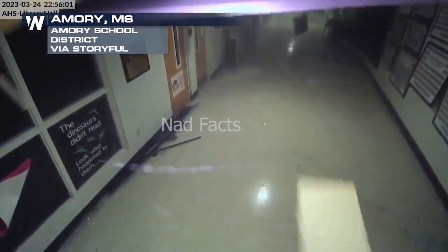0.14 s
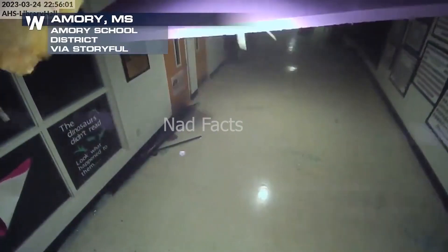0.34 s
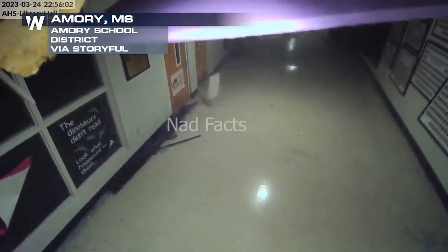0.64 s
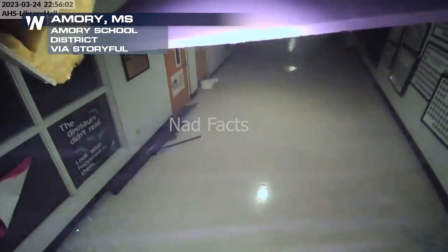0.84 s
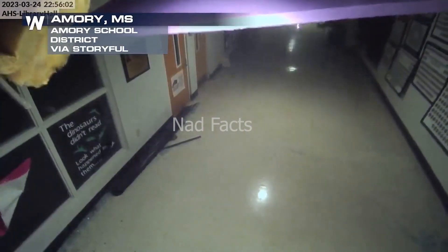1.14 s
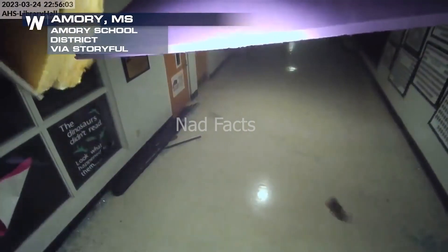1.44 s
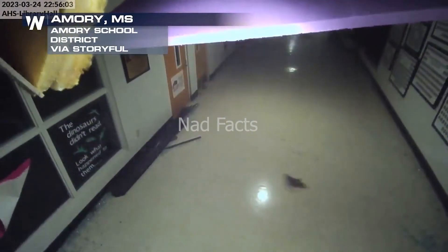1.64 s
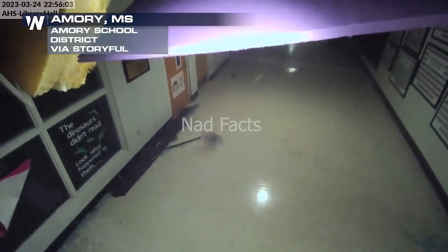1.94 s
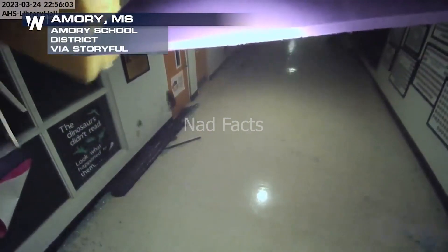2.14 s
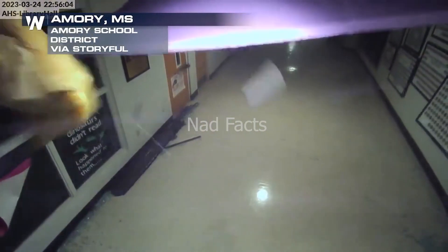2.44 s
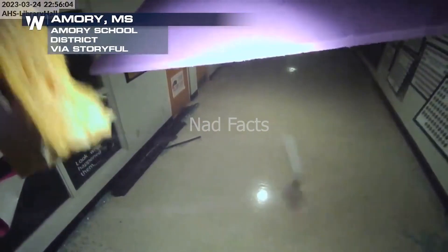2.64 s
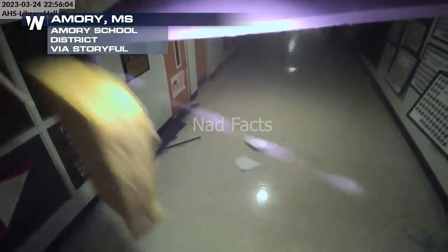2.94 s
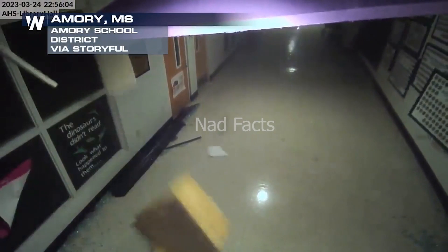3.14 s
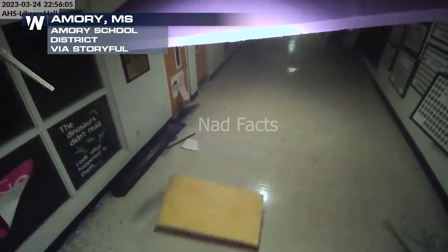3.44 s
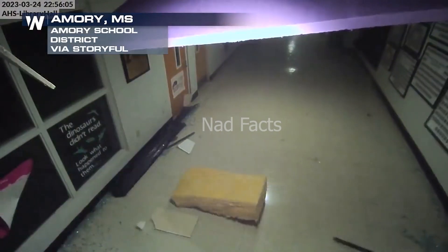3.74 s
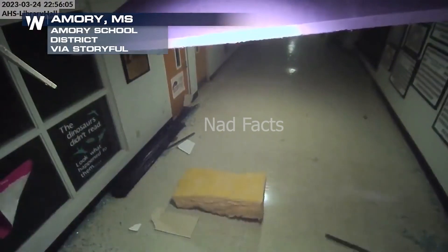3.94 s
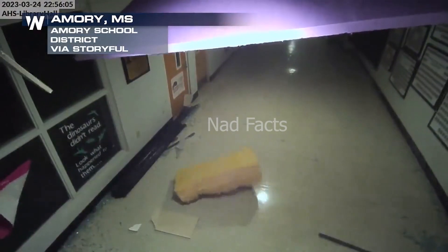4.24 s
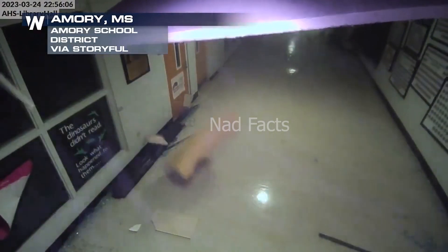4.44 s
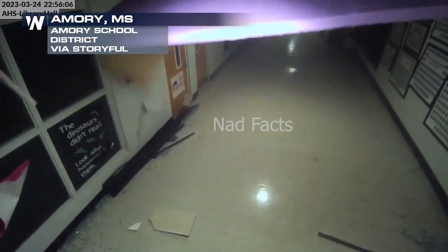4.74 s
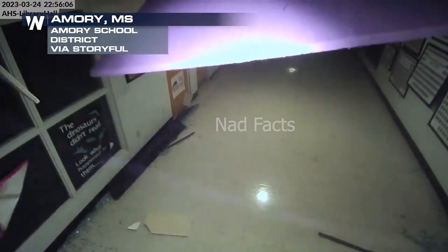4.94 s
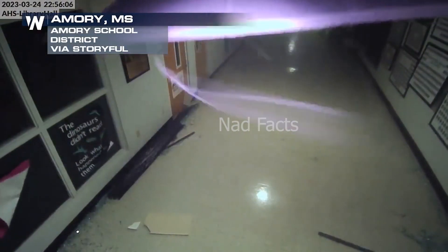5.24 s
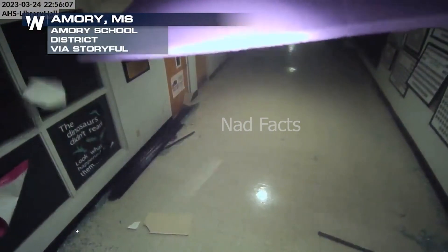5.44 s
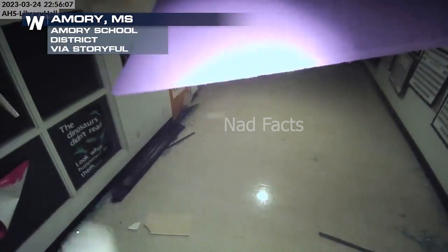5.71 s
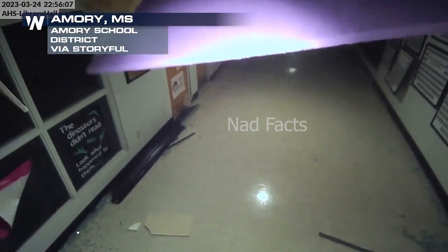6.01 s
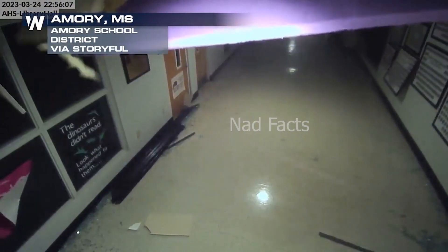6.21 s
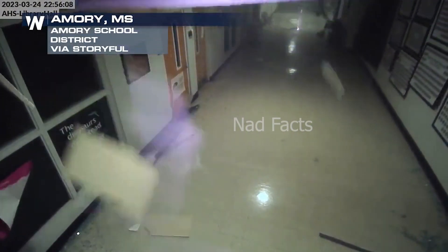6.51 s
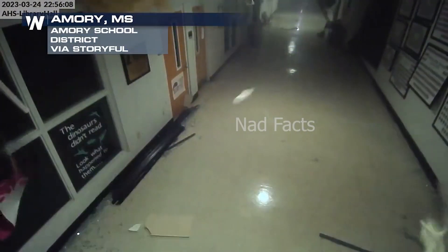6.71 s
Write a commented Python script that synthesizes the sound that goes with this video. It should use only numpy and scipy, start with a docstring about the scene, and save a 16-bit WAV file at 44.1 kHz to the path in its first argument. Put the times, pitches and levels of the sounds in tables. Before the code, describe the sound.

Violent, distorted tornado wind roars and rumbles through a corridor in gusts, with dull knocks of debris and hoarse whistling.

```python
"""A tornado blows through a school corridor, heard by a security camera's small microphone.
It opens on a gust, air and grit rushing along the walls; gaps shriek, then loose panels boom.
After a lull the biggest gust hits at 3.7 s: the building roars and short, dull knocks break through.
Gusts keep coming to the end. Throughout, they drive the input into hard clipping, which chops
the rush into a ragged crackle, and a slow converter lays a thin sizzle on top."""
import sys
import numpy as np
from scipy import signal
from scipy.fft import rfft, irfft
from scipy.io import wavfile
from scipy.ndimage import uniform_filter1d

SR = 44100
rng = np.random.default_rng(int(sys.argv[2]) if len(sys.argv) > 2 else 0)


def generate_wav(sig):
    """Save sig (samples, or channels by samples) to the path in sys.argv[1] as 16-bit PCM at SR."""
    pcm = np.round(np.clip(np.atleast_2d(sig).T, -1, 1) * 32767).astype(np.int16)
    wavfile.write(sys.argv[1], SR, pcm)


N = 302967
TIME, FREQS = np.arange(N) / SR, np.fft.rfftfreq(N, 1 / SR)

# gusts down the corridor: start/s, length/s, push on the mic/dB, building roar/dB, eddy speed/ratio
GUSTS = [(.005, 0.24, -14, -36.5, 1.27), (0.259, 0.14, -19, -35, 1.12), (.42, .5, -29, -31.5, 1.11),
         (0.978, .3, -25, -27, 1.31), (1.321, .36, -22, -27.5, 0.68), (1.849, .23, -17.5, -22, 1.13),
         (2.098, .25, -31.5, -21.5, 1.53), (3.127, 0.1219, -28.5, -30, 1.08),
         (3.674, 0.699, -12.5, -15, 1.056), (4.392, 0.3047, -18, -18.5, 1.05), (4.72, 0.2029, -15, -23, .9),
         (4.994, .65, -21.5, -26.5, 0.96), (5.68, 0.22, -18, -23, 1.01), (5.98, .62, -24, -28.5, .92),
         (6.66, 0.24, -15.5, -21.5, 1.69)]
# tone of eddies hitting the mic: f/Hz, level/dB
BUFFET_EQ = [(8, -17.5), (22, -3.5), (35, 0.5), (60, -3.5), (110, -12), (200, -20.5), (400, -41.5),
             (1000, -54), (3000, -68.5)]
# tone of the rushing air: f/Hz, level/dB
RUSH_EQ = [(60, -12.5), (400, -5), (640, -8), (850, -5), (1150, -3.5), (1450, -0.5), (1570, -4), (1750, -3),
           (1980, 0.5), (2300, 1.5), (2530, 0.5), (2800, 1), (5500, -16), (8000, -27.5)]
# fader and tone ride of the rush: t/s, level/dB, tilt in the steady draught/(dB per octave)
RUSH_RIDE = [(0, -20, 0.5), (0.079, -29.5, 1.5), (.45, -21, 1), (0.901, -21.5, 1), (1.4, -23, 1.5),
             (1.8, -20.7, -0.5), (2.05, -21, 1), (2.3, -23.5, -2), (2.95, -24, 1), (3.2, -25.5, -3),
             (3.6, -26, -.5), (3.949, -25.5, 4), (4.42, -23.5, -1), (5.001, -25, 1), (5.35, -22, -0.5),
             (6.63, -23, -1.5), (6.71, -30.5, 0.5), (6.87, -23.5, 3)]
# tone of the roaring building: f/Hz, level/dB
ROAR_EQ = [(40, -19), (90, -0.5), (140, -1.5), (220, -3.5), (330, -9), (440, -9), (560, -18.5),
           (900, -18.5), (1600, -35.5), (3000, -38)]
# short, dull knocks breaking through the clipped wind: t/s, level/dB, f/Hz, ring time/s
DULL_KNOCKS = [(1.456, -10.5, 1120, 0.052), (3.688, -2, 222, 0.095), (3.752, -2, 810, 0.036),
               (3.941, -1, 800, 0.025), (4.072, -5, 500, 0.057), (4.199, -8.5, 600, 0.022),
               (4.36, -1, 652.8, 0.027), (4.426, -12, 720, 0.25), (4.757, -5.5, 485, 0.21),
               (4.858, -8.5, 950, 0.062), (5.661, -17, 1102, 0.041)]
# loose panels booming in the wind: t/s, level/dB, f/Hz
PANEL_BOOMS = [(.73, -24, 404), (1.009, -22, 142), (2.14, -14.5, 130), (2.233, -13, 403), (3.135, -24, 370),
               (4.552, -12, 167), (6.73, -15, 119)]
# air shrieking through gaps: start/s, end/s, f/Hz, bandwidth/Hz, level/dB
GAP_SHRIEKS = [(0.294, 1.4, 1435, 171, -30.5), (0.315, .85, 1940, 300, -27),
               (0.804, 1.295, 2040, 320, -30.5), (3.155, 3.68, 2635, 203, -32),
               (5.097, 6.699, 1394, 124, -40)]
# tiny sharp ticks: t/s, level/dB
TICKS = [(.4485, -22.5), (1.081, -23), (1.627, -29.5), (1.826, -38), (1.922, -39.5), (3.687, -27.5),
         (6.402, -29), (6.658, -19)]
# the camera's voice-band filter: f/Hz, level/dB
VOICE_BAND_EQ = [(20, 0), (2550, 0), (2640, -3.5), (2820, -7), (2890, -14.5), (3015, -16), (3060, -25),
                 (3190, -26), (3280, -85)]

# the steady draught under the gusts: push on the mic, building roar, eddy speed ratio
DRAUGHT_PUSH_DB, DRAUGHT_ROAR_DB, DRAUGHT_SPEED = -37, -36.5, 1.2


def wind(attack_s=0.02564, release_s=0.05):
    """Gusts rise, hold and die away over the draught: curves of push/dB, roar/dB and eddy speed."""
    push_power = np.full(N, amp(DRAUGHT_PUSH_DB) ** 2)
    roar_power = np.full(N, amp(DRAUGHT_ROAR_DB) ** 2)
    weighted_speed = push_power * DRAUGHT_SPEED
    for start, length, push_db, roar_db, speed in GUSTS:
        age = TIME - start
        envelope = np.clip(age / attack_s, 0, 1) * np.exp(-np.clip((age - length) / release_s, 0, 20))
        gust_power = (amp(push_db) * envelope) ** 2
        push_power += gust_power
        weighted_speed += gust_power * speed
        roar_power += (amp(roar_db) * envelope) ** 2
    return 10 * np.log10(push_power), 10 * np.log10(roar_power), weighted_speed / push_power


def buffet(push_db, speed, lumpy_db=2.5):
    """Eddies strike the mic: a deep, lumpy rumble that pitches up with their speed."""
    eddies = noise(amp(eq_db(BUFFET_EQ, FREQS)))
    passing = np.interp(np.cumsum(speed) % N, np.arange(N), eddies)
    return amp(push_db + lumpy_db * flutter(hz=15)) * steadied(passing, size=5000)


def heave(push_db, speed, trim_db=-4, db_per_octave=-8.5):
    """Subsonic pressure swings pin the mic to its rails; slow, large eddies heave the most."""
    swings = noise(1 / (1 + (FREQS / 15) ** 4) * FREQS / (FREQS + 2))
    return amp(trim_db + push_db + db_per_octave * np.log2(speed)) * steadied(swings, size=16000)


def rush(air_db, tilt, patchy_db=1.25, flicker_db=1.5):
    """Air streams along the walls in drifting patches of colour; tilt is in dB per octave."""
    hz, t, spectra = signal.stft(rng.standard_normal(N), SR, nperseg=1024, noverlap=768)
    octaves = np.log2((hz + 300) / 1800)
    drift = uniform_filter1d(rng.standard_normal(spectra.T.shape), size=12, axis=0)
    patches = unit(uniform_filter1d(drift, size=6, axis=1))
    tilt_db = np.interp(t, TIME, tilt)[:, None] * octaves
    colour = amp(eq_db(RUSH_EQ, hz) + tilt_db + patchy_db * patches)
    colour /= np.linalg.norm(colour, axis=1, keepdims=True)  # the tone moves, the level stays
    _, air = signal.istft(spectra * colour.T, nperseg=1024, noverlap=768)
    return amp(air_db + flicker_db * flutter(hz=60)) * unit(air[:N])


def roar(roar_db, surge_db=2.5):
    """The corridor and its ceiling boom under the wind: a surging low end."""
    body = steadied(noise(amp(eq_db(ROAR_EQ, FREQS))), size=4000)
    return amp(roar_db + surge_db * flutter(hz=25.4)) * body


def knocks(width_ratio=1.16):
    """Short, dull knocks break through the clipped wind, too broad to carry a note."""
    return sum(amp(db) * burst(start, hz, width_ratio * hz, attack_s=0.002, t60=ring_s)
               for start, db, hz, ring_s in DULL_KNOCKS)


def booms(width_ratio=0.21):
    """Loose panels flex with a low, lingering note."""
    return sum(amp(db) * burst(start, hz, width_ratio * hz, attack_s=0.0035, t60=0.39)
               for start, db, hz in PANEL_BOOMS)


def shrieks():
    """Hoarse whistles swell and fade as air is forced through gaps."""
    out = np.zeros(N)
    for start, end, hz, width_hz, db in GAP_SHRIEKS:
        progress = np.clip((TIME - start) / (end - start), 0, 1)
        swell = np.sqrt(abs(np.sin(np.pi * progress)))
        out += amp(db) * swell * resonant_noise(hz, width_hz)
    return out


def grit(air_db, trim_db=-10, taps_per_s=100, spread_db=5.5, decay_s=0.00071):
    """Fine grit taps along the corridor, as hard as the air carries it."""
    t, out = np.arange(400) / SR, np.zeros(N)
    for hz in np.geomspace(900, 2900, num=12):
        taps = rng.random(N) < taps_per_s / 12 / SR
        strength = amp(spread_db * np.minimum(rng.exponential(1, N), 3))
        ping = np.sin(2 * np.pi * hz * t) * np.exp(-t / decay_s)
        out += signal.oaconvolve(taps * strength, ping)[:N]
    return amp(air_db + trim_db) * unit(out)


def ticks():
    """A few tiny, bright ticks, each three samples long."""
    out = np.zeros(N)
    for start, db in TICKS:
        out[round(start * SR):][:3] += amp(db) * np.hanning(5)[1:-1]
    return out


def burst(start, hz, width_hz, attack_s, t60):
    """One burst of resonant noise with a fast attack and a fading tail."""
    age = np.maximum(TIME - start, 0)
    envelope = (1 - np.exp(-age / attack_s)) * np.exp(-np.log(1000) * age / t60)
    return envelope * steadied(resonant_noise(hz, width_hz), size=1200)


def resonant_noise(hz, width_hz):
    """Noise ringing in one resonance."""
    return noise(1 / (1 + ((FREQS - hz) / (0.48 * width_hz)) ** 2))


def flutter(hz):
    """A random modulator of rms one, rolling off above hz."""
    return noise(1 / (1 + (FREQS / hz) ** 4))


def noise(gain):
    """Noise of rms one, shaped by a gain at each frequency."""
    return unit(irfft(rfft(rng.standard_normal(N)) * gain, N))


def steadied(x, size):
    """A leveller: holds the power even over stretches of size samples."""
    power = uniform_filter1d(uniform_filter1d(x ** 2, size), size // 2)
    return x / np.sqrt(abs(power) + 1e-9)


def minimum_phase(curve, size=4096):
    """The impulse response of an EQ curve, with no pre-ring."""
    gain = amp(eq_db(curve, np.fft.rfftfreq(size, 1 / SR)))
    cepstrum = irfft(np.log(gain), size)
    cepstrum[1:size // 2] *= 2
    cepstrum[size // 2 + 1:] = 0
    return irfft(np.exp(rfft(cepstrum)), size)


def eq_db(curve, hz):
    """An EQ curve's level at hz, its points joined over log frequency."""
    points_hz, db = np.transpose(curve)
    return np.interp(np.log(hz + 1), np.log(points_hz), db)


def amp(db):
    """Decibels to gain."""
    return 10 ** (np.asarray(db) / 20)


def unit(x):
    """Scales to an rms of one."""
    return x / np.sqrt(np.mean(x ** 2) + 1e-20)


def scene(swell_db=0.52, dulling=0.26):
    """The mono mix ahead of the clipper."""
    push_db, roar_db, speed = wind()
    times, levels, tilts = np.transpose(RUSH_RIDE)
    air_db = np.interp(TIME, times, levels) + swell_db * flutter(hz=6.1)
    # the rush darkens as a gust builds: dulling is dB per octave lost for each dB of push
    tilt = np.interp(TIME, times, tilts) - dulling * (push_db - DRAUGHT_PUSH_DB)
    low_end = heave(push_db, speed) + buffet(push_db, speed) + roar(roar_db) + booms()
    return (low_end + rush(air_db, tilt) + grit(air_db) + shrieks() + knocks())[None]


def record(dry, rail_db=-18.5, hiss_db=-34.5, hold_samples=4, sizzle_db=1.83, high_cut_hz=11100):
    """Hard clipping under a faint, steady hiss, then voice band, sample-and-hold, ticks, high cut."""
    # while a gust pins the input to its rail, the rest of the scene is cut out
    clipped = np.clip(dry[0], -amp(rail_db), amp(rail_db))
    nyquist_hz = SR / hold_samples / 2
    hiss = amp(hiss_db) * noise(FREQS < nyquist_hz)
    narrow = signal.oaconvolve(clipped + hiss, minimum_phase(VOICE_BAND_EQ))[:N]
    # the converter's stair steps mirror the voice band into a sizzle at 8-11 kHz
    steps = np.repeat(narrow[::hold_samples], hold_samples)[:N]
    sizzling = irfft(rfft(steps) * amp(sizzle_db * (FREQS > nyquist_hz)), N)
    high_cut = signal.firwin(255, high_cut_hz, window=("kaiser", 9), fs=SR)
    return signal.oaconvolve(sizzling + ticks(), high_cut, "same")[None]


dry = scene()
out = record(dry)
generate_wav(out)
```